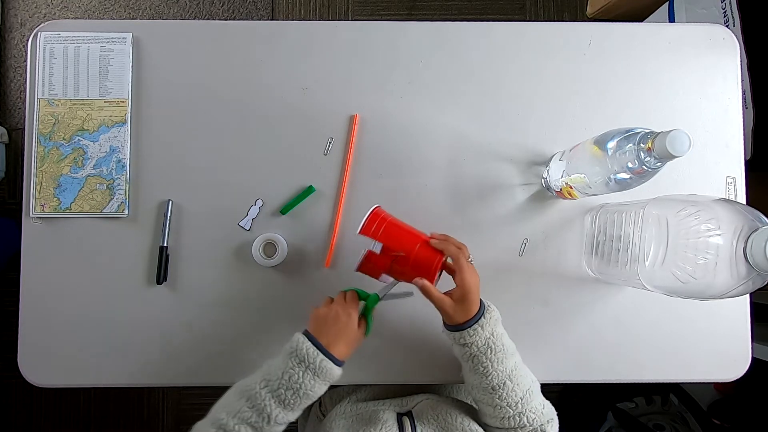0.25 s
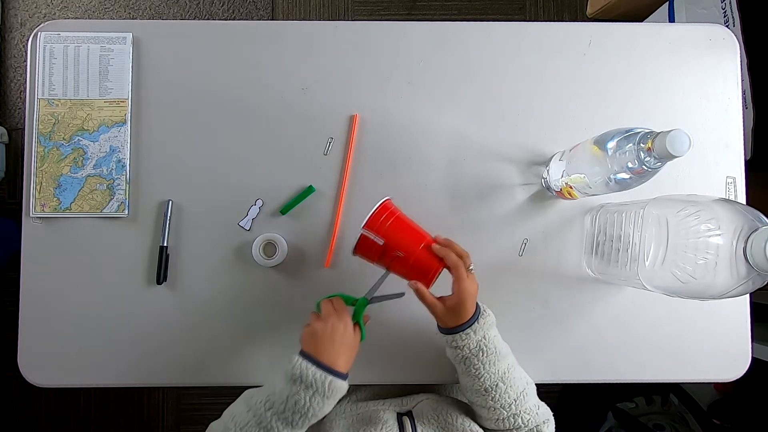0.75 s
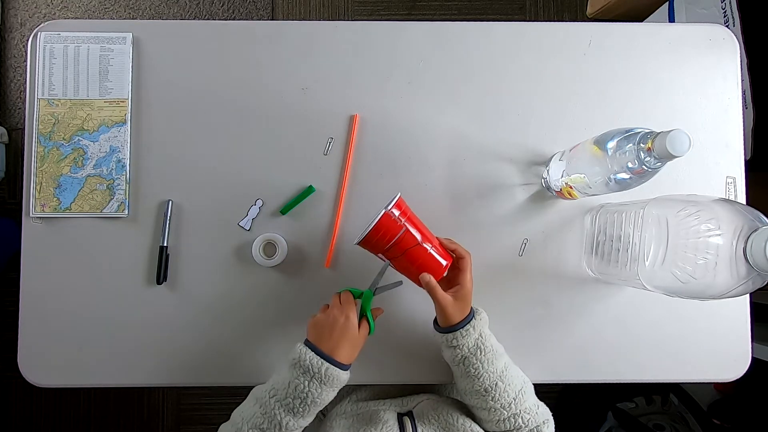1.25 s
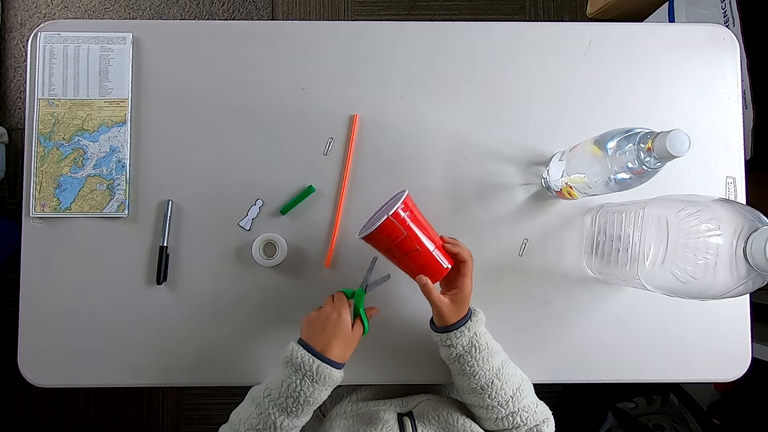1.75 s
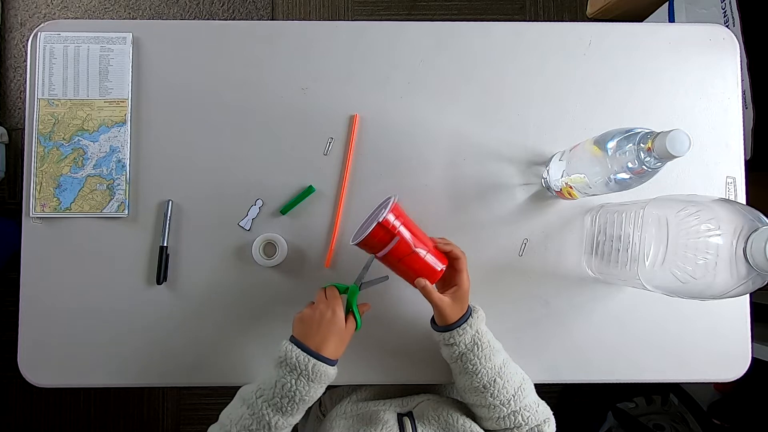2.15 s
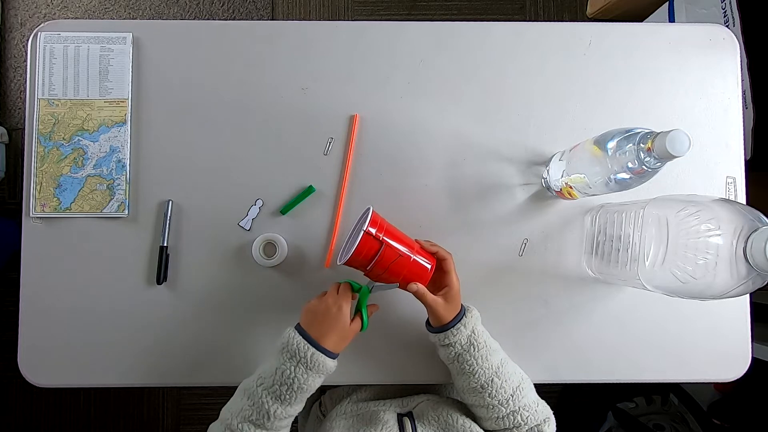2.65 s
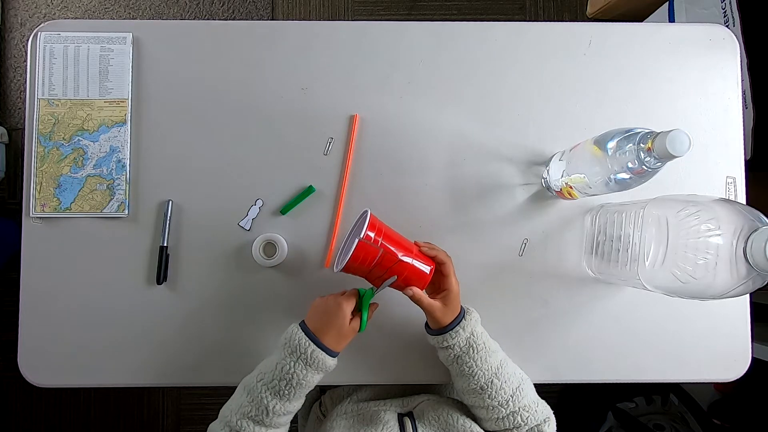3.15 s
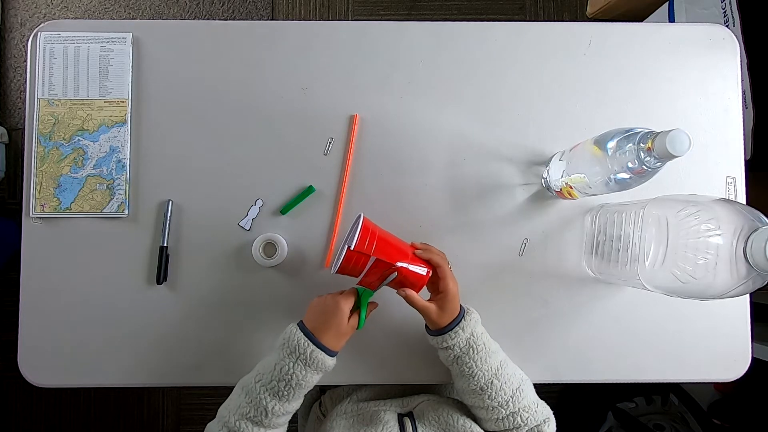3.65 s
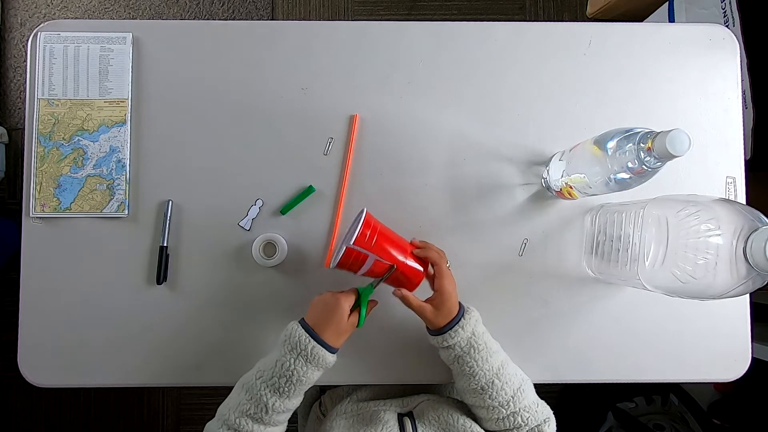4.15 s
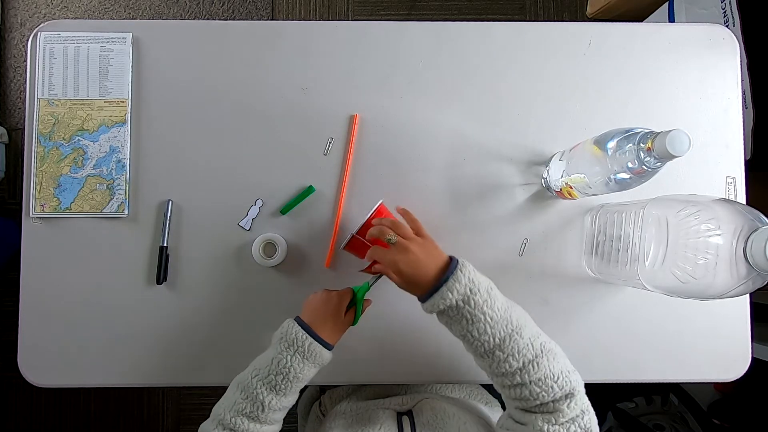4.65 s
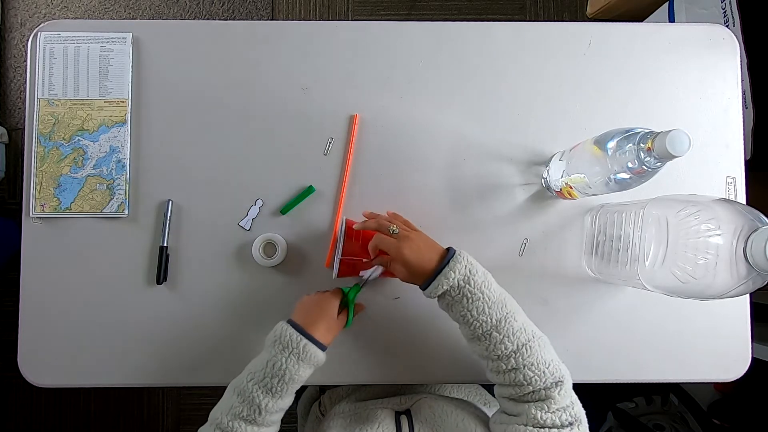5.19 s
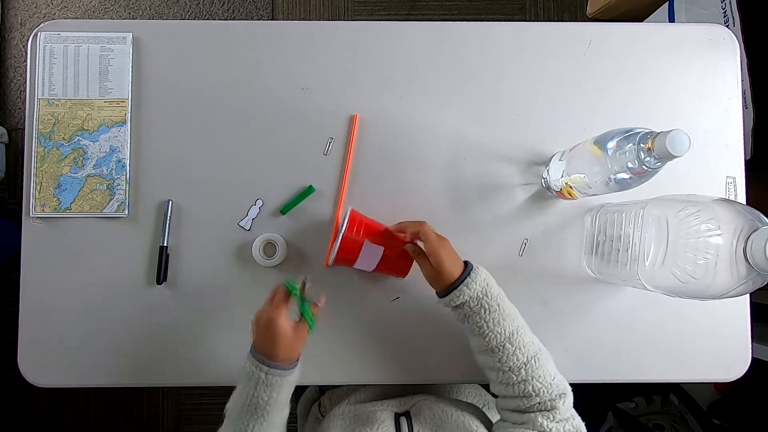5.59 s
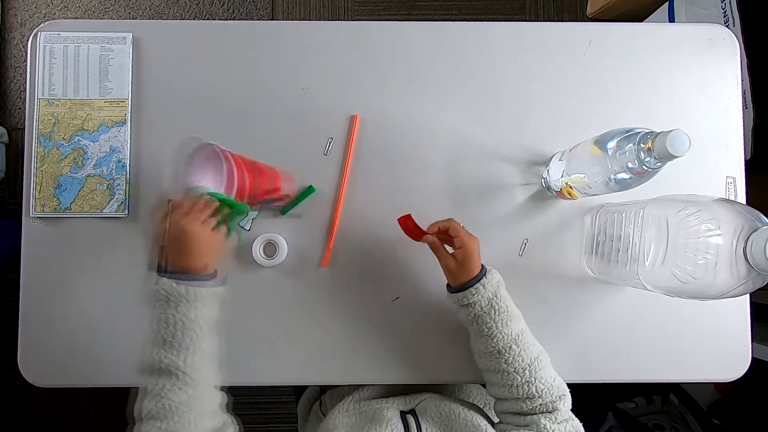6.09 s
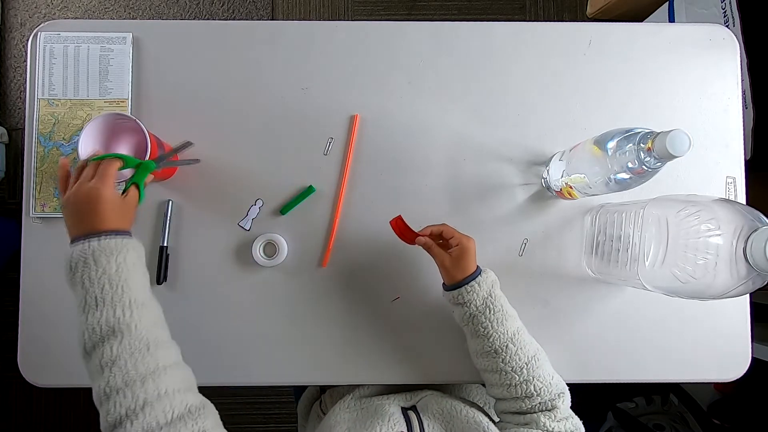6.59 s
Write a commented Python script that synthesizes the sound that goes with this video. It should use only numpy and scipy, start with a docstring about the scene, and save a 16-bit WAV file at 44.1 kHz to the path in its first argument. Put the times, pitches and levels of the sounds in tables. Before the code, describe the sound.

Scissors cut a thin plastic cup with sharp, irregular cracks, hollow pops and short rasps, then the cup is set down with a low knock.

```python
"""Scissors cut a piece out of a thin plastic cup above a table in a small room, over quiet filtered-noise air.
From the start sharp snaps, bursts of micro-cracks, excite the resonances of the shell and the air inside it;
hollow pops of the buckling wall, short rasps and stick-slip slides of the blades soon join between them.
Late in the cutting the cup bumps lightly on the table; at the end it is set down, and decaying modes ring low.
Band by band, the room answers with a pitched echo and a blurred wash of noise."""
import sys
import numpy as np
from scipy import signal
from scipy.fft import rfft, irfft
from scipy.io import wavfile
from scipy.ndimage import uniform_filter1d

SR = 44100
rng = np.random.default_rng(int(sys.argv[2]) if len(sys.argv) > 2 else 0)


def materialize(psi):
    """Save the field psi as 16-bit PCM at rate SR to the path in sys.argv[1].

    A 1-D psi becomes a single channel; in a 2-D psi each row is a channel.
    """
    bounded = np.clip(np.atleast_2d(psi).T, -1, 1)
    quanta = np.round(bounded * 32767).astype(np.int16)
    wavfile.write(sys.argv[1], SR, quanta)


N = 301203  # samples in the scene
AGE = np.arange(SR // 3) / SR  # time since an event began, s


# Levels in the event tables are relative: each layer adds its own offset.
def from_db(db):
    """Logarithmic level: decibels to amplitude gain."""
    return 10 ** (np.asarray(db) / 20)


def rms_one(x):
    """Mean power: scale to rms 1."""
    return x / np.sqrt(np.mean(x ** 2) + 1e-20)


def blow(x, db):
    """Impulse energy: scale a short sound to the energy of 0.01 s at this level."""
    reference_samples = SR / 100
    return from_db(db) * x / np.sqrt(np.sum(x ** 2) / reference_samples + 1e-20)


def at_hz(points, hz):
    """Logarithmic frequency scale: interpolate a table along it."""
    f, value = np.transpose(points)
    return np.interp(np.log(hz + 1), np.log(f), value)


def coloured(x, spectrum):
    """Spectral shaping: weight a noise by a level spectrum; rms 1."""
    gain = from_db(at_hz(spectrum, np.fft.rfftfreq(len(x), 1 / SR)))
    return rms_one(irfft(rfft(x) * gain, len(x)))


def band(x, low_hz, high_hz):
    """Band-pass filtering between two frequencies."""
    return signal.sosfilt(signal.butter(2, [low_hz, high_hz], "band", fs=SR, output="sos"), x + 1e-18)


def add(out, s, sound):
    """Superposition: mix a sound in at a time."""
    start = max(round(s * SR), 0)
    out[start:start + len(sound)] += sound[:len(out) - start]


def grains(size, spread_db):
    """Random excitation: dense tiny fractures of uneven size."""
    size_db = spread_db * np.clip(rng.standard_normal(size), -2, 2)
    return rng.standard_normal(size) * from_db(size_db)


def stutter(size, slips_per_s, uneven_db):
    """Stick-slip: the blade catches and lets go, an uneven gain."""
    slips = np.arange(size) / SR * slips_per_s
    levels = np.clip(rng.standard_normal(size), -2, 2)
    return from_db(uneven_db * np.interp(slips, np.arange(size), levels))


def swell(length_s, rise=0.64, fall=1.276):
    """Crack growth envelope: a crack gathers speed and runs out."""
    progress = AGE / max(length_s, 1e-4)
    return progress ** rise * np.exp(-progress ** fall / 2) + 1e-18


def resonate(x, modes, hz):
    """Modal superposition: parallel resonances around a main frequency, with dark skirts."""
    out = 0
    for k, (ratio, width, db) in enumerate(modes):
        radius = np.exp(-np.pi * width / SR)  # a wider resonance dies away faster
        angle = 2 * np.pi * ratio * hz / SR
        zeros, poles = [1 - radius, 0, radius - 1], [1, -2 * radius * np.cos(angle), radius ** 2]
        sign = (-1) ** k  # neighbours in opposite phase
        out = out + sign * from_db(db) * signal.lfilter(zeros, poles, x)
    return signal.sosfilt(signal.butter(1, [hz / 3, hz * 2], "band", fs=SR, output="sos"), out)


# Spectrum of the quiet air: f/Hz, level/dB
AIR_SPECTRUM = [(15, -57), (25, -14.5), (69, -6.5), (122, -3), (178, -15.5), (246, -9.5), (274, -12.5),
                (469, -21.5), (3930, -32.5), (9810, -33.5), (15500, -36)]
AIR_DB = -57.5  # rms level, dB


def air():
    """Stationary broadband noise: the quiet air, weighted by its spectrum."""
    return from_db(AIR_DB) * coloured(rng.standard_normal(N), AIR_SPECTRUM)


# Reverberation time of the room, with a floor of 0.05 s: f/Hz, t60/s
ROOM_T60 = [(100, 0.095), (300, 0.26), (800, 0.46), (2000, 0.33), (5000, 0.44), (13000, 0.059)]


def echo_decay(hz, first_echo_s=0.0033, build_s=0.00067, near_db=7.5, near_s=0.025):
    """Exponential reverberant decay: echoes build up and fade, strongest at first from the table; energy 1."""
    late = np.maximum(AGE - first_echo_s, 0)
    from_room = from_db(-60 * late / max(at_hz(ROOM_T60, hz), 1 / 20))
    from_table = from_db(near_db) * np.exp(-late / near_s)
    shape = (1 - np.exp(-late / build_s)) * (from_room + from_table)
    return shape / np.sqrt(np.sum(shape ** 2))


# Strength of the echo: f/Hz, level/dB
ROOM_LEVEL = [(60, -10), (200, -8.5), (400, -2), (900, -4), (2000, -5.5), (5000, -9.5), (13000, -10.5)]


def room(x):
    """Reverberation: part of the echo repeats the sound's pitches by convolution.

    The rest leaves the cup in other directions and blurs into noise that follows the decaying power.
    """
    blurred, hop = 0.28, 16  # share of echo power in the wash; samples per power reading
    response, wash = np.zeros(len(AGE)), np.zeros(N)
    edges = np.geomspace(70, 17000, 25)  # band limits, Hz
    for low, high in zip(edges, edges[1:]):
        hz = np.sqrt(low * high)
        gain, decay = from_db(at_hz(ROOM_LEVEL, hz)), echo_decay(hz)
        tail = band(rng.standard_normal(len(AGE)), low, high) * decay
        response += gain * tail * np.sqrt(2 * (high - low) / SR / np.sum(tail ** 2))
        power = uniform_filter1d(band(x, low, high) ** 2, hop)[::hop]
        lingering = np.abs(signal.fftconvolve(power, hop * decay[::hop] ** 2))
        envelope = np.repeat(np.sqrt(lingering), hop)[:N]
        wash += gain * envelope * rms_one(band(rng.standard_normal(N), low, high))
    echo = signal.oaconvolve(x, response)[:N]
    return x + np.sqrt(1 - blurred) * echo + np.sqrt(blurred) * wash


# Spectrum of bright cracking: f/Hz, level/dB
CRACK_SPECTRUM = [(2000, -18), (2900, -12.5), (3300, -4.5), (3800, 1.5), (4600, 5.5), (5500, 1), (6200, 3),
                  (7900, -4), (9200, -17), (11000, -23.5), (16000, -33)]


def crack_noise(x):
    """Spectral shaping: the bright noise of cracking plastic."""
    return coloured(x, CRACK_SPECTRUM)


# Spectrum of the mid-range clack: f/Hz, level/dB
CLACK_SPECTRUM = [(700, -31.5), (1100, 4), (1350, 2), (1900, -2.5), (2400, -8), (2900, -4.5), (4000, -29.5)]


def clack_noise(x):
    """Spectral shaping: the mid-range noise of a plastic clack."""
    return coloured(x, CLACK_SPECTRUM)


# Cup and table top ringing together, before sag and the closing fade: f/Hz, level/dB, t60/s
TABLE_MODES = [(117.8, -13.5, 0.71), (139, -8, 0.37), (155.4, -2, 0.13), (175.6, -16, 0.34),
               (228.3, -14, 0.52), (342.3, -6.5, 0.2), (397, -4, 0.24), (420, -1, 0.053), (540, -6, 0.13),
               (727, -8, 0.085), (781, -10.5, 0.085), (883, 8.5, 0.055)]


def table_ring(sag=0.015, sag_s=0.015):
    """Damped modal vibration: cup and table top ring, sagging in pitch as the pressure eases."""
    clock = AGE + sag * sag_s * (1 - np.exp(-AGE / sag_s))  # runs fast at first
    ring = np.zeros(len(AGE))
    for hz, level, t60 in TABLE_MODES:
        phase = 2 * np.pi * (hz * clock + rng.random())
        ring += from_db(level - 60 * AGE / t60) * np.sin(phase)
    return ring * np.cos(np.pi / 2 * AGE / AGE[-1])  # faded smoothly to silence by the end


# The cup bumps on the table: t/s, level/dB
LANDING = [(5.245, -28.5), (5.275, -29.5), (6.452, -17.5)]


def landing(ring_db=-0.5, settle_s=0.00235, contact_s=0.0056, thud_db=-12.0, clack_db=-13.5,
            tick_db=-23.0, low_hz=88, thud_hz=1000):
    """Impact excitation: the base chatters to rest, a noisy contact over the low ring of cup and table."""
    out = np.zeros(N)
    for s, db in LANDING:
        ring = table_ring() * (1 - np.exp(-AGE / settle_s))
        contact = rng.standard_normal(len(AGE))
        fade = swell(contact_s, rise=0.25, fall=0.78)
        add(out, s, blow(band(ring, low_hz, 2 * thud_hz), db + ring_db))
        add(out, s, blow(band(fade * contact, low_hz, thud_hz), db + thud_db))
        add(out, s, blow(fade * clack_noise(contact), db + clack_db))
        add(out, s, blow(fade * crack_noise(contact), db + tick_db))
    return out


# Shell modes around the main one: frequency ratio, width/Hz, level/dB
WALL_MODES = [(.75, 70, -8.5), (.93, 49.6, -2), (1.002, 42, -0.5), (1.23, 70, -9)]


def wall(force, hz):
    """Shell resonance: the modes of the cup wall."""
    return resonate(force, WALL_MODES, hz)


# Modes of the air in the cup: frequency ratio, width/Hz, level/dB
HOLLOW_MODES = [(.89, 24.4, -1.5), (1, 22.27, 0.5), (1.25, 46, -5)]


def hollow(force, hz):
    """Cavity resonance: the air in the cup."""
    return resonate(force, HOLLOW_MODES, hz)


# Spectrum of sliding friction: f/Hz, level/dB
HISS_SPECTRUM = [(500, -20.5), (1100, 12), (1800, 9.5), (2700, 2), (4400, 6), (7500, 4), (11000, -6.5),
                 (13800, -7), (16000, -8)]
# Blades and fingers slide along the wall: start t/s, end t/s, hiss level/dB, cup level/dB
SLIDES = [(0.683, 0.906, -45.5, -37), (2.617, 2.662, -49, -38), (2.79, 2.839, -43, -35),
          (2.863, 3.007, -61.5, -47.5), (3.386, 3.484, -47, -38.5), (3.572, 3.635, -53, -43),
          (4.198, 4.281, -48, -54), (4.667, 4.845, -53.5, -40), (5.03, 5.079, -43.5, -32.5),
          (5.218, 5.338, -43, -30.5), (5.389, 5.478, -55.5, -41), (5.613, 5.795, -56.5, -51),
          (6.681, 6.686, -57.5, -72.5), (6.74, 6.825, -67.5, -83)]
# Before each snap the blades bite in and creak: hiss relative to the crack, cup relative to the shell
BITE_S, BITE_HISS_DB, BITE_CUP_DB = 0.011, -40, -31


def slides(wall_hz=830, hollow_hz=375, hiss_db=1.5, wall_db=-4.5, hollow_db=-9.5,
           slips_per_s=170, uneven_db=4.0):
    """Stick-slip friction: steel on plastic hisses and makes the cup hum, in slides and before each snap."""
    friction, grip = grains(N, spread_db=1.0), stutter(N, slips_per_s, uneven_db)
    force = grip * friction
    hiss = from_db(hiss_db) * rms_one(grip * coloured(friction, HISS_SPECTRUM))
    cup = from_db(wall_db) * rms_one(wall(force, wall_hz))
    cup += from_db(hollow_db) * rms_one(hollow(force, hollow_hz))
    bites = [(s - BITE_S, s, crack + BITE_HISS_DB, shell + BITE_CUP_DB) for s, crack, _, shell, _ in SNAPS]
    out = np.zeros(N)
    for start, end, hiss_level, cup_level in list(SLIDES) + bites:
        span = np.arange(round(start * SR), min(round(end * SR), N))
        speed = np.sin(np.linspace(0, np.pi, len(span)))
        sliding = from_db(hiss_level) * hiss[span] + from_db(cup_level) * cup[span]
        out[span] += np.abs(speed) ** 0.5 * sliding
    return out


def thump(push_s=0.00031, low_hz=36):
    """Volume displacement: the wall jumps aside and pushes out one puff of air."""
    puff = AGE * np.exp(-AGE / push_s) + 1e-18
    return signal.sosfilt(signal.butter(2, low_hz, "high", fs=SR, output="sos"), puff)


def relaxing(tick_db=-22.0, earliest_s=0.007, latest_s=0.031, tick_s=0.0019, fade_s=0.018, count=4):
    """Elastic recovery: the bent wall springs back in a few ticks, tending to weaken with delay."""
    out, tick = np.zeros(len(AGE)), swell(tick_s)
    for share, size in rng.random((count, 2)):
        delay = earliest_s + share * (latest_s - earliest_s)
        add(out, delay, from_db(tick_db) * (0.5 + size) * np.exp(-delay / fade_s) * tick)
    return out


# Stiff parts keep their pitches whatever the grip: reference f/Hz (the ring is at 0.93 of it), width/Hz, level/dB
RIM_MODES = [(609, 24, -13.5), (754, 38, -1.5), (840.5, 40, 3), (1030, 33, 3), (1293, 22, -5),
             (1410, 24, -6.5), (1669, 60, -8.5), (1973, 36, 2), (2375, 12, -10.5), (2479, 79, -7)]


def rim(force):
    """Stiffness-controlled resonance: the rolled rim and the base ring on after a break."""
    return sum(resonate(force, [(0.93, width, db)], hz) for hz, width, db in RIM_MODES)


# Spectrum of the top treble of a sharp break: f/Hz, level/dB
EDGE_SPECTRUM = [(6000, -22.5), (9000, 1.5), (10500, 1), (11800, -4), (13500, 1.5), (15000, -6.5),
                 (16000, -20)]
# The stiff rim and the cut flap: frequency ratio, width/Hz, level/dB
FLAP_MODES = [(1, 88.1, -1), (1.31, 158.9, -8.5)]
FLAP_OCTAVES = 0.14  # standard deviation of the flap's pitch from break to break
# dB gained per dB of the break: thump with the sharp edge, hollow with the shell; share of the crack in the flap
THUMP_FOLLOWS, HOLLOW_FOLLOWS, FLAP_CRACK_SHARE = 0.76, 0.81, 0.58
THUMP_CRISPNESS = 0.26  # a crisp break pushes out more air: dB of thump per dB of crack above shell


def fracture(crack, sharpness, shell, length_s, flap_hz, wall_hz, hollow_hz, crack_db, edge_db, clack_db,
             flap_db, rim_db, wall_db, hollow_db, thump_db, push_share):
    """Source and resonator: a swell of micro-cracks rings the flap, the rim, the shell and the hollow."""
    tearing = grains(len(AGE), spread_db=4.0)
    run = swell(length_s) * stutter(len(AGE), slips_per_s=630, uneven_db=3.5) + relaxing()
    force = swell(push_share * length_s) * tearing  # the wall is released early in the break
    bend = 2 ** (FLAP_OCTAVES * rng.standard_normal())
    edge = crack + sharpness
    flap = shell + FLAP_CRACK_SHARE * (crack - shell)
    puff = THUMP_FOLLOWS * edge + THUMP_CRISPNESS * (crack - shell)

    sound = blow(run * crack_noise(tearing), crack + crack_db)
    sound += blow(run * coloured(tearing, EDGE_SPECTRUM), edge + edge_db)
    sound += blow(run * clack_noise(tearing), flap + clack_db)
    sound += blow(resonate(force, FLAP_MODES, flap_hz * bend), flap + flap_db)
    sound += blow(rim(force), shell + rim_db)
    sound += blow(wall(force, wall_hz), shell + wall_db)
    sound += blow(hollow(force, hollow_hz), HOLLOW_FOLLOWS * shell + hollow_db)
    return sound + blow(thump(), puff + thump_db)


# The blades chew through a few millimetres: t/s, crack level/dB, shell level/dB, hollowness level/dB, length t/s
RASPS = [(0.5815, -40.5, -42.5, 1, .01), (1.3586, -46.5, -40.5, -4, 0.0046),
         (1.7387, -34, -39.5, 3.5, .007), (2.5304, -27.5, -37.5, 4, 0.0044),
         (2.575, -25.5, -39.5, 3, 0.0045), (2.6616, -32, -38.5, -0.5, 0.0063),
         (2.7734, -25, -37.5, 5.5, 0.012), (2.9337, -45, -45, 12, 0.01), (2.974, -45, -39.5, -1.5, 0.0026),
         (3.5526, -40.5, -42, -22, 0.0084)]


def rasps(lead_s=0.0018, hollow_db=-10.0):
    """Slow crack propagation: drawn-out breaks, each with its own length."""
    out = np.zeros(N)
    for s, crack, shell, hollowness, length_s in RASPS:
        sound = fracture(crack, 0, shell, length_s, flap_hz=1640, wall_hz=865, hollow_hz=380,
                         crack_db=-9.0, edge_db=-24.5, clack_db=-9.0, flap_db=-16.0, rim_db=-12.0,
                         wall_db=1.5, hollow_db=hollow_db + hollowness, thump_db=-25.0, push_share=0.59)
        add(out, s - lead_s, sound)
    return out


# The loosened wall buckles and pops back: t/s, crack level/dB, sharpness level/dB, shell level/dB,
# hollowness level/dB, pitch of the air in the cup f/Hz
BUCKLES = [(0.5416, -33, 10, -33, 0.5, 382), (4.6467, -26, 5, -30, 1, 435),
           (5.2437, -19.5, 3.5, -27.5, 11.5, 316), (5.2748, -22, 2, -21, 6.5, 331),
           (5.2976, -31.5, -3, -26, 1.5, 310), (5.3322, -43, -8, -29.5, 5, 322),
           (5.442, -51, -2.5, -41.5, 6, 340), (5.672, -42, -0.5, -42, 1.5, 319),
           (5.8069, -10.5, -3, -13, -3.5, 420), (5.8262, -18, -5.5, -24, 6.5, 404),
           (5.847, -20, -4.5, -38, 12.5, 405), (5.913, -27, -13, -34.5, -2, 340),
           (5.949, -41, 3.5, -60, -11, 362)]


def buckles(length_s=0.0024, lead_s=0.0004, hollow_db=-14.5):
    """Snap-through buckling: hollow pops in which the rim and the air in the cup ring strongly."""
    out = np.zeros(N)
    for s, crack, sharpness, shell, hollowness, hollow_hz in BUCKLES:
        sound = fracture(crack, sharpness, shell, length_s, flap_hz=1890, wall_hz=831, hollow_hz=hollow_hz,
                         crack_db=-10.5, edge_db=-26.5, clack_db=-8.0, flap_db=-11.0, rim_db=-3.0,
                         wall_db=-7.0, hollow_db=hollow_db + hollowness, thump_db=-25.0, push_share=0.28)
        add(out, s - lead_s, sound)
    return out


# The blades break through the wall: t/s, crack level/dB, sharpness level/dB, shell level/dB, hollowness level/dB;
# sharp breaks add top treble and a thump
SNAPS = [(0.113, -19.5, 3, -25.5, 3), (0.175, -24, -5, -32, -12), (0.181, -25, 9, -33.5, 1),
         (0.224, -5, 1, -18, -12), (0.8590, -13.5, 2, -15.5, -1), (1.2074, -26.5, 4, -25.5, -3),
         (1.2371, -34, -2, -30.5, 0.5), (1.2945, -23.5, 1, -29.5, 0), (1.4511, -45.5, -13, -43.5, 4),
         (1.502, -39, -19, -49, -8), (1.5797, -10.5, 5.5, -28, -6), (1.988, -40.5, 0, -37.5, 6),
         (2.097, -45.5, 2, -48, 3), (2.1599, -32.5, 8.5, -33, 6.5), (2.2275, -37, 9, -34, 9),
         (2.247, -28.5, 8, -19, 4), (2.261, -11, 6, -22.5, -11), (2.3672, -2, -2.5, -16.5, 9.5),
         (3.1626, -10.5, 0.5, -15, 7), (3.7807, -27.5, -2.5, -36.5, 5), (3.8115, -5, 4.5, -16.5, -7.5),
         (3.8142, -4.5, -16, -17, -5), (3.9698, -37, 9, -25.5, 2.5), (4.1421, -19.5, 7.5, -21, 8.5),
         (4.1606, -24.5, -4, -41, -9), (4.1908, -14.5, -3, -24, -2.5), (4.1965, -18.5, -3, -24, -6.5),
         (4.3861, -23.5, 20, -25.5, -4), (4.6536, -19.5, -4, -19.5, -5.5), (4.714, -33.5, 0, -30.5, -7),
         (4.7437, -32.5, 4, -38, -14), (4.79, -29.5, 3, -32.5, 1.5), (4.8729, -34, -2, -32.5, 5),
         (4.9805, -7, 7, -22.5, -5), (5.0278, -26, 5, -19, 5.5), (5.1614, -38, 10, -44, 7)]
# The cut lengthens and the shell's pitch creeps up: at the start (Hz), rise (Hz per s)
SHELL_HZ, SHELL_RISE_HZ_PER_S = 809.5, 17.6


def snaps(length_s=0.0024, lead_s=0.0004, hollow_db=-23.0):
    """Rapid brittle fracture: short bright breaks as the blades close."""
    out = np.zeros(N)
    for s, crack, sharpness, shell, hollowness in SNAPS:
        wall_hz = SHELL_HZ + SHELL_RISE_HZ_PER_S * s
        sound = fracture(crack, sharpness, shell, length_s, flap_hz=1410, wall_hz=wall_hz, hollow_hz=388.6,
                         crack_db=-11.0, edge_db=-29.0, clack_db=-13.5, flap_db=-28.0, rim_db=-11.5,
                         wall_db=-4.5, hollow_db=hollow_db + hollowness, thump_db=-30.5, push_share=0.34)
        add(out, s - lead_s, sound)
    return out


def scene():
    """Linear superposition: the cutting and the landing in the room, over quiet air."""
    cutting = snaps() + buckles() + rasps() + slides()
    return (room(cutting + landing()) + air())[None]


def record(dry):
    """Saturation and band limiting: the highest peaks are rounded and the top is cut."""
    cutoff_hz = 15950
    return signal.sosfilt(signal.ellip(10, 0.1, 80, cutoff_hz, fs=SR, output="sos"), np.tanh(dry))


dry = scene()
out = record(dry)
materialize(out)
```